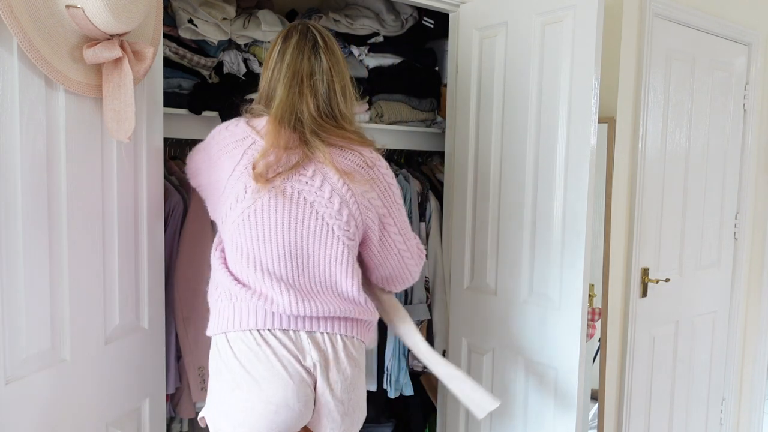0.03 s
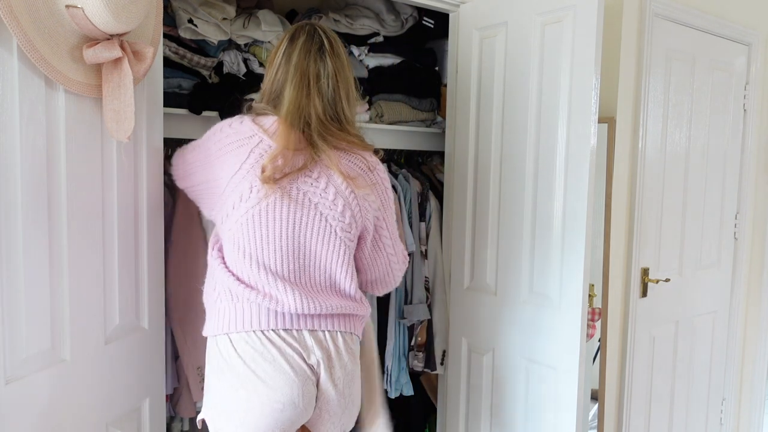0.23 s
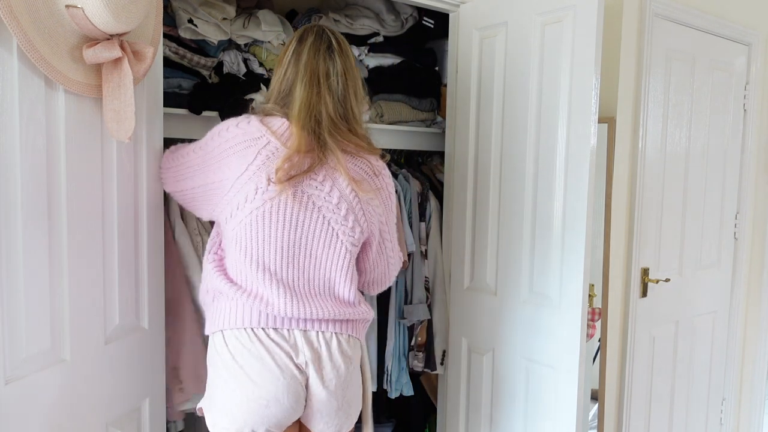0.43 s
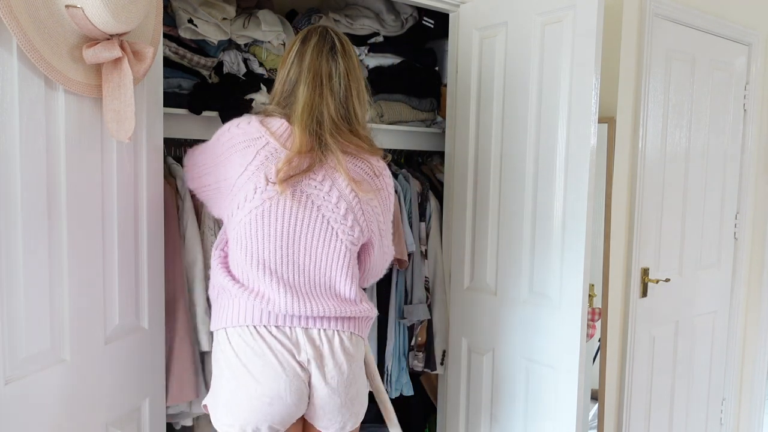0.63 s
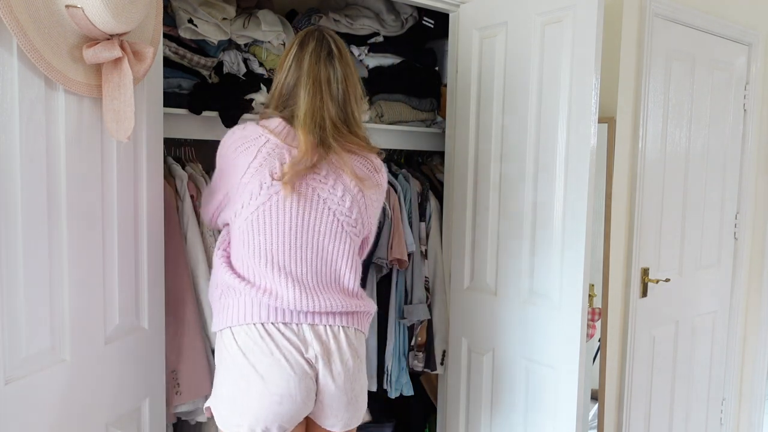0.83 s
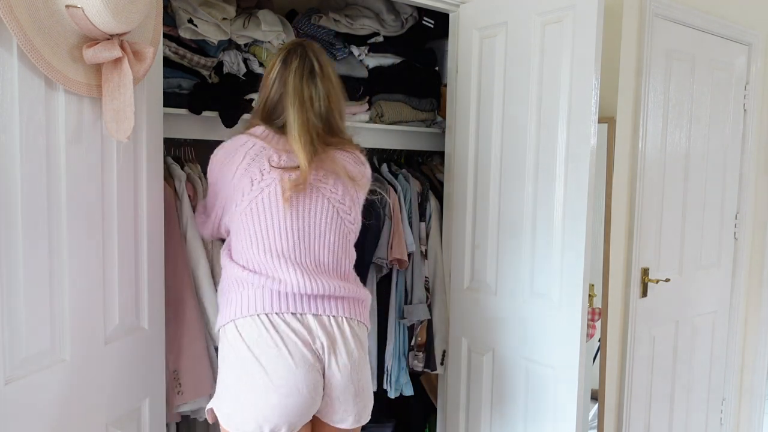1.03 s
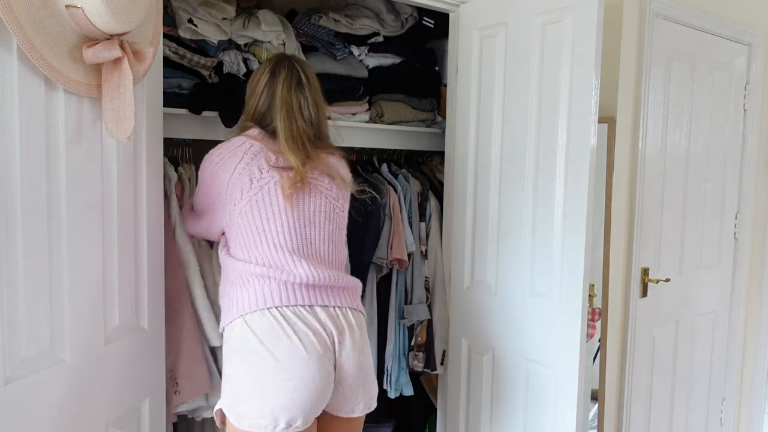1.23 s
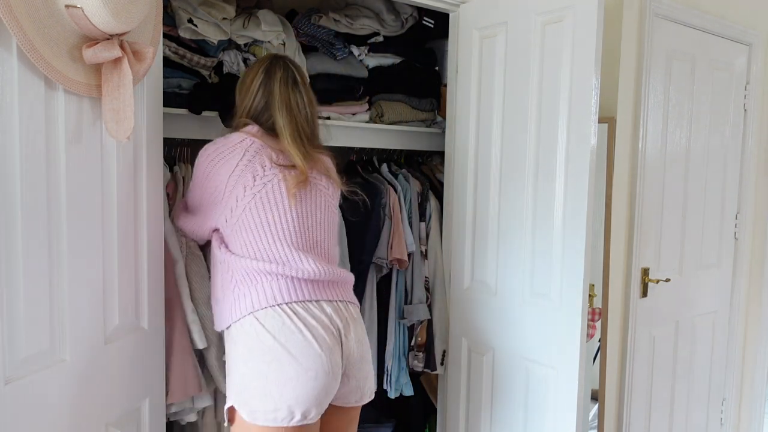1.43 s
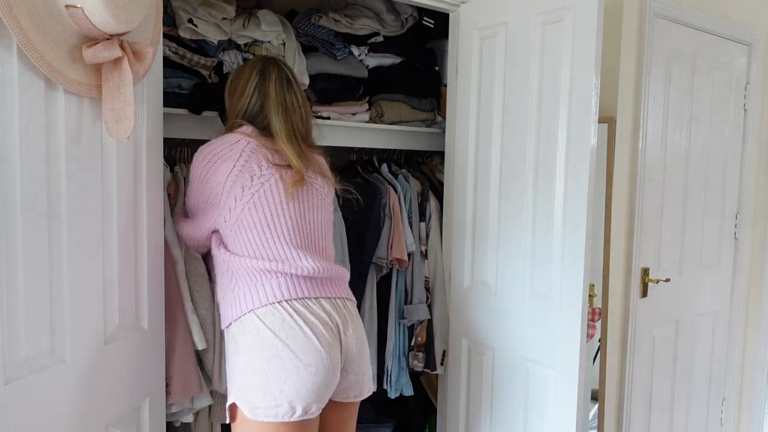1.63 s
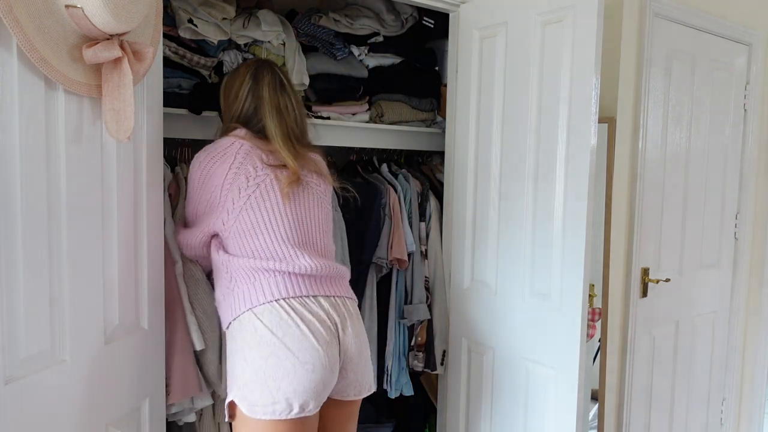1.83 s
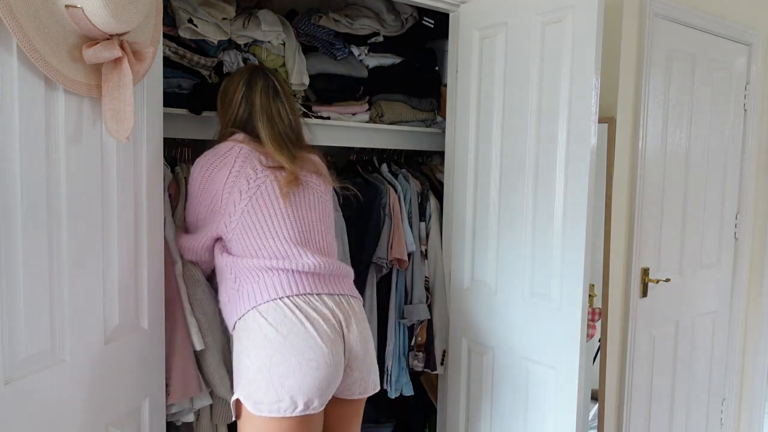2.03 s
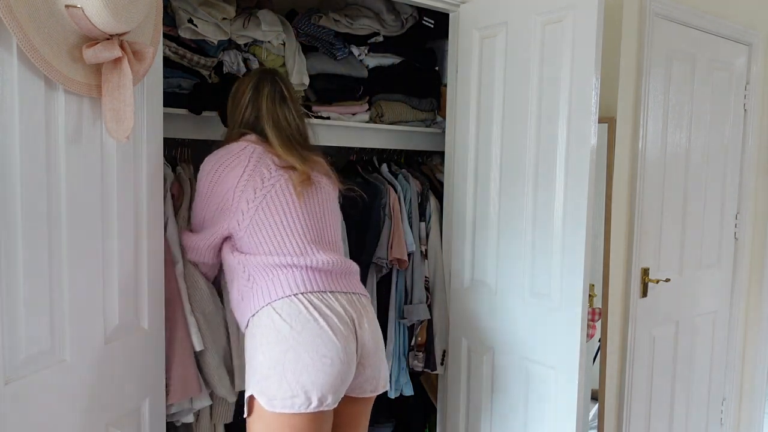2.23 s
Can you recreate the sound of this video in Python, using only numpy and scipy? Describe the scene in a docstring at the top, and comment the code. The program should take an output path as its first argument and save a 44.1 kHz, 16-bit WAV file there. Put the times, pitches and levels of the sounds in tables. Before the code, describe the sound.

Quick burst of hanger clacks and metallic scraping on a wardrobe rail, a pause with soft rustling clothes, a short double clack, then a single crisp snap, over low room hush, heard fairly close.

```python
"""In a quiet bedroom a garment is hung in a wardrobe, over a low steady hush of shaped noise.
The hanger's hook clatters and scrapes on the metal rail; two hangers knock together, one snaps on the rail.
Each blow is a short noisy crack plus ringing tones; scraping is many tiny slips, with a few brief squeaks.
Clothes rustle and bump as swells of soft grains, and the small room answers with dense reflections.
"""
import sys
import numpy as np
from scipy import signal
from scipy.fft import rfft, irfft
from scipy.io import wavfile
from scipy.ndimage import uniform_filter1d

SR = 44100
rng = np.random.default_rng(int(sys.argv[2]) if len(sys.argv) > 2 else 0)


def wav_record(signal):
    """Record a signal, one row per channel, as 16-bit PCM in the file named by sys.argv[1]."""
    frames = np.transpose(np.atleast_2d(signal))
    bounded = np.clip(frames, -1, 1)
    # unit amplitude maps onto the largest positive 16-bit level
    quanta = np.round(bounded * 32767).astype(np.int16)
    wavfile.write(sys.argv[1], SR, quanta)


N = 101429
TIME_S = np.arange(N) / SR
HZ = np.fft.rfftfreq(N, 1 / SR)

# steady room air: its colour, [f/Hz, level/dB]
HUSH_COLOUR = [(25, -48), (64, -50), (82, -14), (141, -2.5), (229, -1.5), (270, -5.5), (476, -5.5),
               (734, -8.5), (1040, -5.5), (1230, -6.5), (1950, -10.5), (2220, -2.5), (2410, -14),
               (5140, -21), (16000, -34.5)]
# how wide the hush is between the ears, [f/Hz, side level/dB]
HUSH_WIDTH = [(60, -10), (250, -5.5), (1000, -6.5), (4000, -6), (14000, -19)]
# clothes brushing and swinging, [t/s, length/s, level/dB]
RUSTLES = [(0, 0.23, -60), (.5, 0.69, -58), (1.72, 0.2, -56.5)]
# colour of rustling cloth, [f/Hz, level/dB]
CLOTH_COLOUR = [(100, -9), (500, 3.5), (1200, 9.5), (2200, 5), (4500, -1), (9000, -18), (16000, -33)]
# dull bumps of clothes against the wardrobe, [t/s, length/s, level/dB]
BUMPS = [(0, 0.18, -61), (.3, 0.18, -50.5), (1.34, 0.065, -59), (1.42, 0.12, -59), (2.23, 0.052, -54.5)]
# colour of the bumped wardrobe, [f/Hz, level/dB]
WARDROBE_COLOUR = [(30, -27.5), (65, -13), (115, -1.5), (220, 4), (275, -2.5), (600, -23), (1500, -21),
                   (6000, -61)]
# hooks sliding on the rail, [t/s, length/s, level/dB, brightness/(dB per octave), slips/(1/s)]
SLIDES = [(0.189, 0.0083, -54, 7, 2400), (0.22, 0.18, -41.5, -1.5, 3000), (0.301, 0.11, -32, -1, 2400),
          (0.584, 0.019, -49.5, -4.5, 1500), (1.329, 0.088, -52.5, -1.5, 630), (1.36, 0.011, -40, 1, 2700),
          (1.463, 0.031, -47, -3, 1200)]
# colour of hook friction, [f/Hz, level/dB]
SCRAPE_COLOUR = [(100, -23), (500, -5.5), (1000, -3), (1500, 2.5), (2500, 3.5), (4500, 1), (8000, -0.5),
                 (13500, -8), (16000, -2)]
# brief squeaks of a dragged hook at its resonances, [t/s, length/s, level/dB, f/Hz, width/Hz]
SQUEAKS = [(0.191, 0.011, -51, 5030, 900), (0.2226, 0.0088, -34.5, 9400, 1400),
           (0.319, 0.0055, -26.5, 4940, 900), (1.331, 0.056, -51.5, 1400, 200),
           (1.81, 0.021, -47, 1990, 400)]
# hook blows on the rail, [t/s, level/dB, brightness/(dB per octave)]
HOOK_BLOWS = [(.2162, -39, 11), (.2195, -34, 2), (.2245, -41, 0), (.2270, -23, -3), (.2302, -30, -1),
              (.2440, -32, 0.5), (.2468, -33, 0.5), (.3045, -35.5, 14), (.3073, -30, 4), (.3145, -30, -0.5),
              (.3325, -34.5, -2), (.3445, -30, -4), (.3510, -34.5, -2.5), (.3648, -31.5, -3.5),
              (.3678, -30.5, -1.5), (.3895, -49, 7), (.4112, -37.5, -1), (1.3625, -48.5, 3),
              (1.3672, -50, 11), (1.3775, -48, -8)]
# tones the hook rings with, [f/Hz, level/dB, time to fall 60 dB/s]
HOOK_TONES = [(910, -0.5, 0.038), (1464, 4.5, 0.066), (1591, 6.5, 0.026), (2228, 10.5, 0.07),
              (2816, -7, 0.049), (2973, -8, 0.07), (3984, 3, 0.079), (5200, -9, 0.033), (7470, -18, 0.013)]
# colour of the hook's crack, [f/Hz, level/dB]
HOOK_CRACK = [(80, -14), (450, -16), (900, -18), (1150, -5), (1550, 3), (3000, 2), (5500, 0), (9500, 0),
              (14000, -5.5), (16000, -28)]
# hangers snapping against the rail, [t/s, level/dB, brightness/(dB per octave)]
SNAPS = [(.3217, -26.5, -1.5), (1.6826, -55, 7), (1.6843, -30, 0), (1.6856, -27.5, -3), (1.6880, -33, -2),
         (1.718, -49, -7.5)]
# tones of a snap, [f/Hz, level/dB, time to fall 60 dB/s]
SNAP_TONES = [(575.4, -14, 0.21), (818, -7.5, 0.14), (1600, -11, 0.08), (1880, -22, 0.027),
              (2202, 9, 0.018), (2810, -4, 0.028), (3780, -18, 0.017), (4266, 3, 0.035), (4700, -2, .025),
              (5490, -3, .025), (6120, -20, 0.017), (6600, 5, .03), (11150, 0, 0.064)]
# colour of a snap's crack, [f/Hz, level/dB]
SNAP_CRACK = [(100, -50), (280, 2), (450, -32), (1200, -10.5), (2000, 0), (3100, -4.5), (4500, 1.5),
              (6500, 0), (7600, -0.5), (12000, -3.5), (16000, -8)]
# hanger shoulders knocking and rattling after, [t/s, level/dB, brightness/(dB per octave)]
KNOCKS = [(1.4275, -34, -6), (1.4312, -28.5, 2), (1.4342, -28, -0.5), (1.4725, -49, 15), (1.4935, -51, 5)]
# tones of a knock, [f/Hz, level/dB, time to fall 60 dB/s]
KNOCK_TONES = [(1156, -5, 0.061), (1242, 5.5, 0.079), (2010, -2, 0.024), (2274, -4, .04), (2830, 5, 0.031),
               (3450, -1, 0.019)]
# colour of a knock's crack, [f/Hz, level/dB]
KNOCK_CRACK = [(100, -4.5), (450, -18.5), (800, -0.5), (1300, -0.5), (3300, 3), (4200, -7), (5400, -5),
               (8000, -24), (16000, -69)]
# how long the first reflections last, [f/Hz, time to fall 60 dB/s]
ROOM_T60 = [(150, 0.88), (1000, 0.36), (2000, 0.36), (5000, 0.28), (14000, .25)]
# colour of the reflections, [f/Hz, level/dB]
ROOM_COLOUR = [(250, -4.5), (700, -3), (1500, -7.5), (5000, -4.5), (14000, -2.5)]
# how wide the reflections are between the ears, [f/Hz, side level/dB]
ROOM_WIDTH = [(150, -10.5), (700, -10.5), (2000, -19), (5000, -84), (14000, -35)]
# balance between the ears, [f/Hz, left minus right/dB]
LEAN = [(500, 1.2), (2000, 1.5), (7000, 0), (13000, 1.3)]

HUSH_DB, HUSH_PATCHY_DB = -55.5, -0.07
SLIP_SPREAD_DB, CLUMP_DB, CLUMP_S = 3.5, 2.5, .004  # unevenness of slips, and of their clumps
SLIDE_FADE_DB = -4  # a slide grows softer towards the end of its stroke
BODY_WIDTH_HZ, BODY_DB = 310, 10.5  # the crack is stronger around each ringing tone
DETUNE = 0.02  # largest share by which a tone shifts with the point of contact
RIGID_HZ = 105  # below this a hanger is too small to radiate
KNOCK_ROOM_DB = -2.5  # clothes around the knocking hangers soak up part of their reflections
WALL_RING_DB = -5  # the reflections carry more of the crack than of the ring
ROOM_GAP_S, LATE_DB, LATE_STRETCH = .008, -24, 3.7  # a faint, slower tail outlasts the first reflections
EDGE_HZ = 15900  # upper limit of the sound


def amp(db):
    """Turns decibels into a gain."""
    return 10 ** (np.asarray(db) / 20)


def unit(x):
    """Scales a sound to an average (rms) strength of one."""
    return x / np.sqrt(np.mean(x ** 2) + 1e-20)


def read(points, hz):
    """Reads a curve between its points, on a log-frequency axis."""
    f, value = np.transpose(points)
    return np.interp(np.log(hz + 1), np.log(f + 1), value)


def tilt(hz, db_per_octave):
    """Brightness in dB: a slope that pivots at 3000 Hz and is flat outside 800 to 12000 Hz."""
    return db_per_octave * np.log2(np.clip(hz, 800, 12000) / 3000)


def add(mix, start_s, sound):
    """Mixes a sound in at its start time."""
    part = mix[max(round(start_s * SR), 0):][:len(sound)]
    part += sound[:len(part)]


def colour(x, points, bright_db=0):
    """Filters a sound to a given colour without smearing it ahead of its start."""
    hz = abs(np.fft.fftfreq(4096, 1 / SR))
    log_gain = np.log(amp(read(points, hz) + tilt(hz, bright_db)))
    # the Hilbert transform gives the phase that makes the filter act at once
    taps = np.fft.ifft(np.exp(np.conj(signal.hilbert(log_gain)))).real[:len(hz) // 2]
    return signal.fftconvolve(x, taps / np.linalg.norm(taps))[:len(x)]


def arch(start_s, length_s):
    """A soft rise and fall, silent outside its span."""
    return np.sqrt(abs(np.sin(np.pi * np.clip((TIME_S - start_s) / length_s, 0, 1))))


def grains(per_s, spread_db):
    """Sparse tiny slips of uneven size: single clicks at random moments."""
    happens = rng.random(N) < per_s / SR
    size_db = spread_db * np.minimum(rng.exponential(1, N), 3)
    return unit(happens * rng.choice([-1., 1.], N) * amp(size_db))


def spread(mid, other, side_points):
    """Makes left and right from a shared sound and an unrelated one added with opposite signs."""
    side = irfft(rfft(other) * amp(read(side_points, HZ)), N)
    return np.array([mid + side, mid - side])


def hush():
    """Steady room air: coloured noise, very slightly patchy over time and pitch."""
    hz, _, z = signal.stft(rng.standard_normal(N), SR, nperseg=2048, noverlap=1536)
    patches = uniform_filter1d(rng.standard_normal(z.shape), size=8, axis=0)
    patches = unit(uniform_filter1d(patches, size=8, axis=1))
    z = z * amp(read(HUSH_COLOUR, hz)[:, None] + HUSH_PATCHY_DB * patches)
    return amp(HUSH_DB) * unit(signal.istft(z, nperseg=2048, noverlap=1536)[1][:N])


def swells(rows, points, per_s, spread_db):
    """Soft contact of cloth: fine grains that swell and fade with each push."""
    push = sum(amp(level_db) * arch(start_s, length_s) for start_s, length_s, level_db in rows)
    return colour(grains(per_s, spread_db) * push, points)


def rustles():
    """Clothes brush along each other: many small, soft contacts."""
    return swells(RUSTLES, CLOTH_COLOUR, per_s=7500, spread_db=-2.0)


def bumps():
    """Clothes bump the wardrobe: fewer contacts with a dull, low colour."""
    return swells(BUMPS, WARDROBE_COLOUR, per_s=3600, spread_db=2.5)


def slides(edge_s):
    """A hook sticks and slips along the rail in uneven clumps; sparser slips are heard as crackle."""
    out = np.zeros(N)
    wander = unit(uniform_filter1d(rng.standard_normal(N), round(CLUMP_S * SR)))
    clumps = unit(amp(CLUMP_DB * np.clip(wander, -2, 2)))
    for start_s, length_s, level_db, bright_db, per_s in SLIDES:
        since = TIME_S - start_s
        fade_in = np.clip(since / edge_s, 0, 1)
        fade_out = np.clip((length_s - since) / edge_s + 1, 0, 1)
        softening = amp(SLIDE_FADE_DB * np.clip(since / length_s, 0, 1) ** 2)
        stroke = fade_in * fade_out * softening
        slips = grains(per_s, SLIP_SPREAD_DB) * clumps * stroke
        out += amp(level_db) * colour(slips, SCRAPE_COLOUR, bright_db)
    return out


def squeaks():
    """Brief friction tones: noise narrowed around a resonance, under a soft arch."""
    out = np.zeros(N)
    for start_s, length_s, level_db, hz, width_hz in SQUEAKS:
        resonance = 1 / (1 + ((HZ - hz) / (width_hz / 2)) ** 2)
        tone = irfft(rfft(rng.standard_normal(N)) * resonance, N)
        out += amp(level_db) * unit(tone) * arch(start_s, length_s)
    return out


def blows(rows, tones, crack_points, crack_t60, ring_db):
    """Each blow is a short crack of dense vibration, strongest near the tones, which ring on after it."""
    out, t = np.zeros(N), np.arange(SR // 4) / SR
    hz, tone_db, t60 = np.transpose(tones)
    head = SR // 200  # levels are set over the first 5 ms
    grid = np.linspace(0, SR / 2, num=2049)
    near_tone = np.exp(-((grid[:, None] - hz) / (BODY_WIDTH_HZ / 2)) ** 2).max(1)
    body = np.column_stack([grid, read(crack_points, grid) + BODY_DB * near_tone])
    for start_s, level_db, bright_db in rows:
        burst = rng.choice([-1., 1.], len(t)) * amp(-60 * t / crack_t60)
        crack = colour(burst, body, bright_db)
        # each blow excites the tones a little differently
        size_db = tone_db + tilt(hz, bright_db) + rng.standard_normal(len(hz))
        size = amp(size_db) * rng.choice([-1., 1.], len(hz))
        tuned = hz * (1 + DETUNE * (2 * rng.random(len(hz)) - 1))
        ring = size @ (amp(-60 * t / t60[:, None]) * np.sin(2 * np.pi * tuned[:, None] * t))
        sound = crack / crack[:head].std() + amp(ring_db) * ring / ring[:head].std()
        add(out, start_s, amp(level_db) * sound / sound[:head].std())
    return out


def clatter(ring_offset_db):
    """The hook strikes the rail: a crack with a clear ring."""
    return blows(HOOK_BLOWS, HOOK_TONES, HOOK_CRACK, crack_t60=0.034, ring_db=-4 + ring_offset_db)


def snaps(ring_offset_db):
    """A hanger snaps against the rail: mostly crack, with a weaker ring."""
    return blows(SNAPS, SNAP_TONES, SNAP_CRACK, crack_t60=0.032, ring_db=-14.0 + ring_offset_db)


def knocks(ring_offset_db):
    """Two hangers knock together: a shorter crack with a clear ring."""
    return blows(KNOCKS, KNOCK_TONES, KNOCK_CRACK, crack_t60=0.019, ring_db=-4 + ring_offset_db)


def clacks(knock_db=0, ring_offset_db=0):
    """All hanger blows as they radiate in one direction; each direction differs in fine detail."""
    return clatter(ring_offset_db) + snaps(ring_offset_db) + amp(knock_db) * knocks(ring_offset_db)


def thin(x):
    """Takes away the bass that a small body cannot radiate."""
    return signal.sosfilt(signal.butter(4, RIGID_HZ, "highpass", fs=SR, output="sos"), x)


def room(x):
    """Dense reflections after a short gap, each band dying at its own speed, with a faint late tail."""
    taps = rng.choice([-1., 1.], SR) * (rng.random(SR) < 1 / 10)
    hz, t, z = signal.stft(taps, SR, nperseg=256)
    fall_db = -60 * t / read(ROOM_T60, hz)[:, None]
    fade = np.hypot(amp(fall_db), amp(LATE_DB + fall_db / LATE_STRETCH))
    tail = signal.istft(z * fade, SR, nperseg=256)[1]
    out = np.zeros(N)
    add(out, ROOM_GAP_S, signal.fftconvolve(x, tail / np.linalg.norm(tail)))
    return irfft(rfft(out) * amp(read(ROOM_COLOUR, HZ)), N)


def scene():
    """Hangers and clothes heard directly and by way of the walls, over the hush."""
    rubbing = rustles() + bumps() + thin(slides(edge_s=0.0057) + squeaks())
    direct = rubbing + thin(clacks())
    walls_one_way = room(rubbing + thin(clacks(KNOCK_ROOM_DB, WALL_RING_DB)))
    walls_other_way = room(rubbing + thin(clacks(KNOCK_ROOM_DB, WALL_RING_DB)))
    shared = (walls_one_way + walls_other_way) / np.sqrt(2)
    unrelated = (walls_one_way - walls_other_way) / np.sqrt(2)
    heard = spread(direct + shared, unrelated, ROOM_WIDTH)
    return heard + spread(hush(), hush(), HUSH_WIDTH)


def record(dry):
    """Leans the sound slightly to the left, then removes what lies above the upper limit."""
    half_lean_db = np.outer([.5, -.5], read(LEAN, HZ))
    leaning = irfft(rfft(dry) * amp(half_lean_db), N)
    edge = signal.firwin(511, EDGE_HZ, window=("kaiser", 9), fs=SR)
    return signal.oaconvolve(leaning, edge[None], "same")


dry = scene()
out = record(dry)
wav_record(out)
```